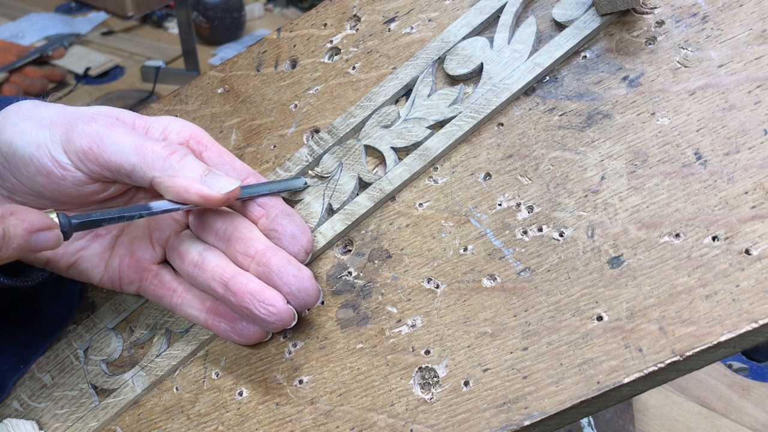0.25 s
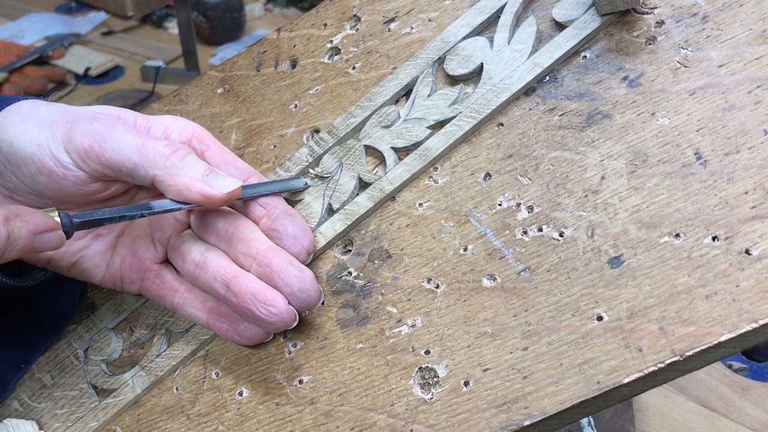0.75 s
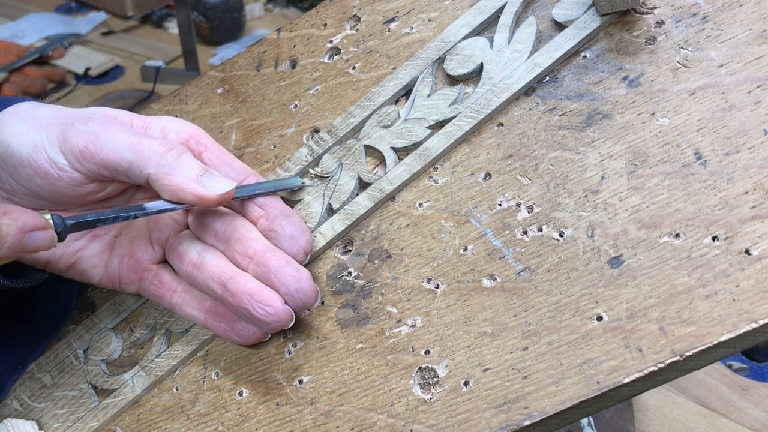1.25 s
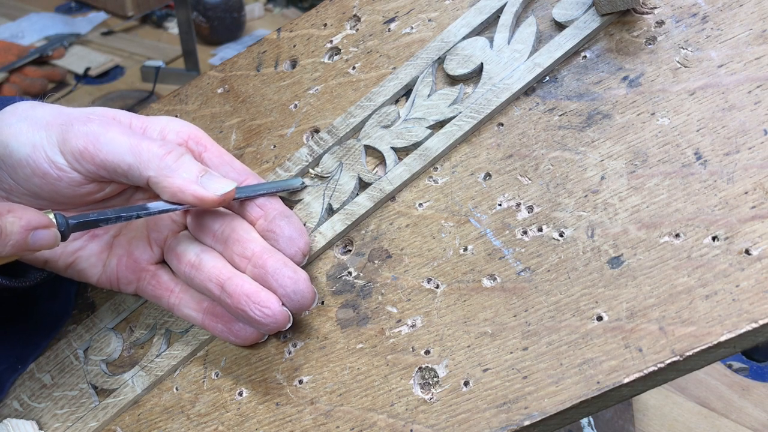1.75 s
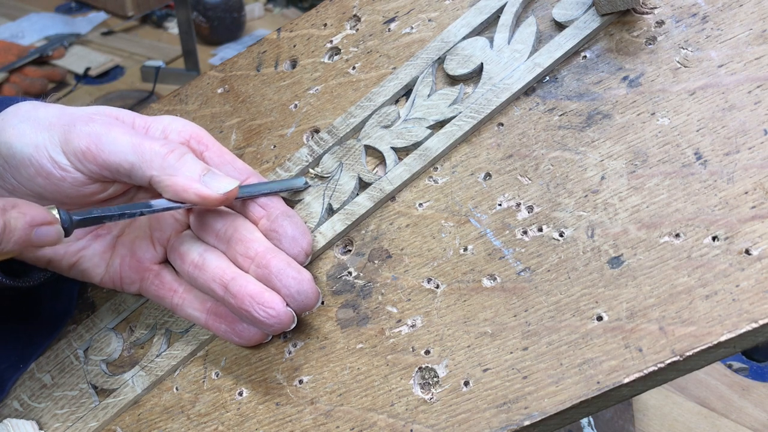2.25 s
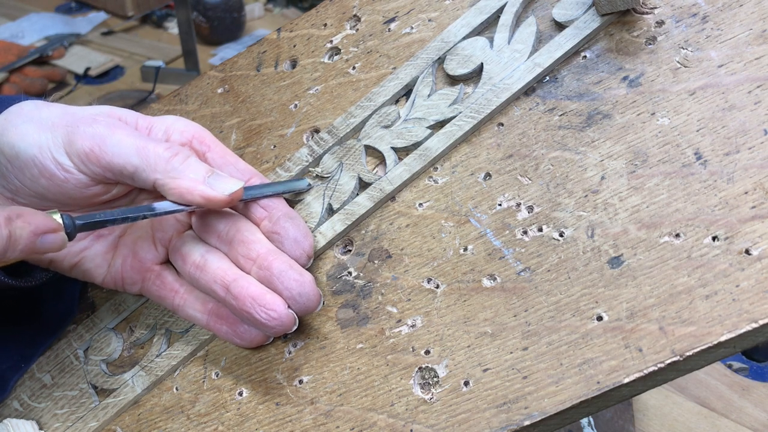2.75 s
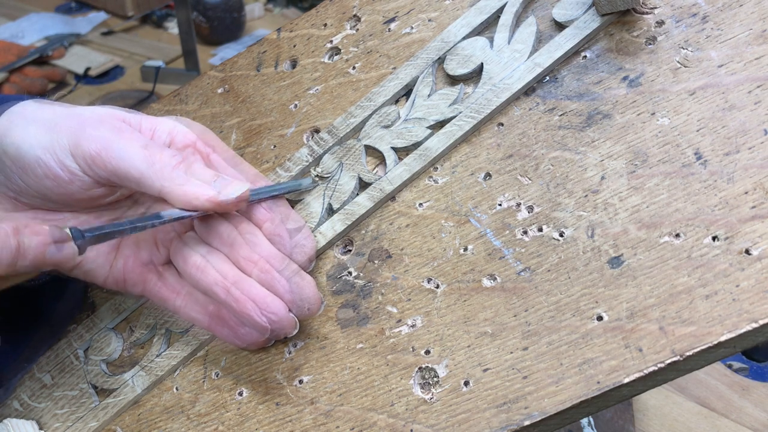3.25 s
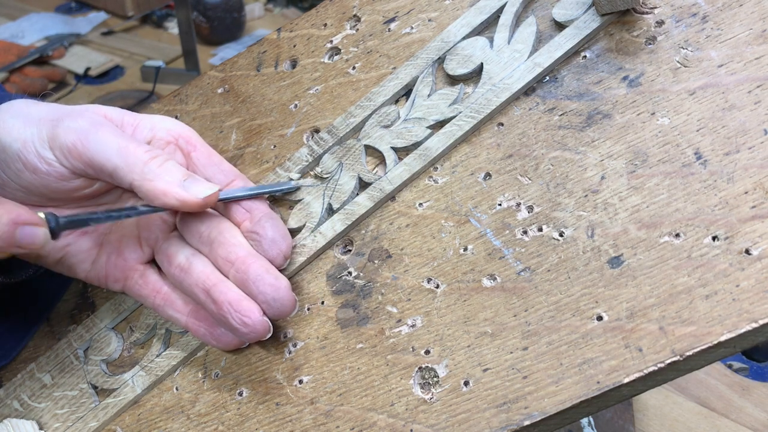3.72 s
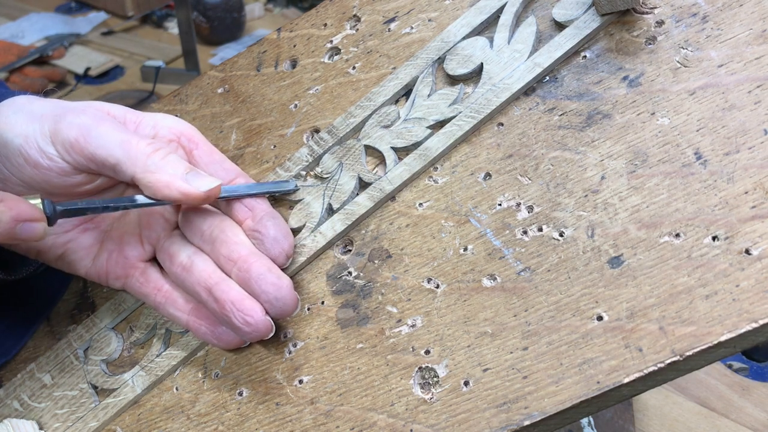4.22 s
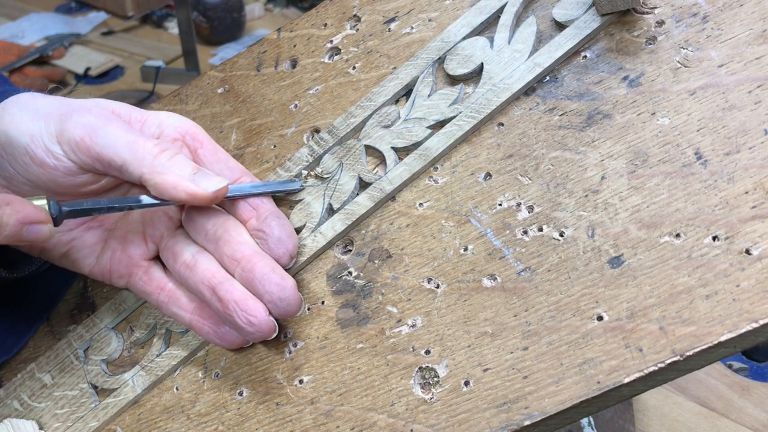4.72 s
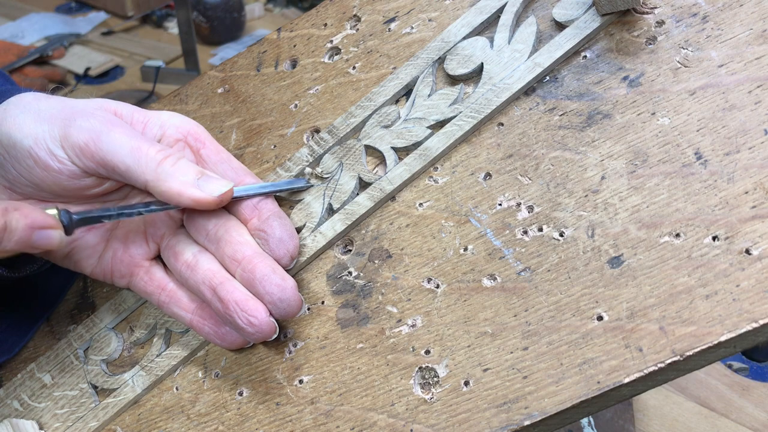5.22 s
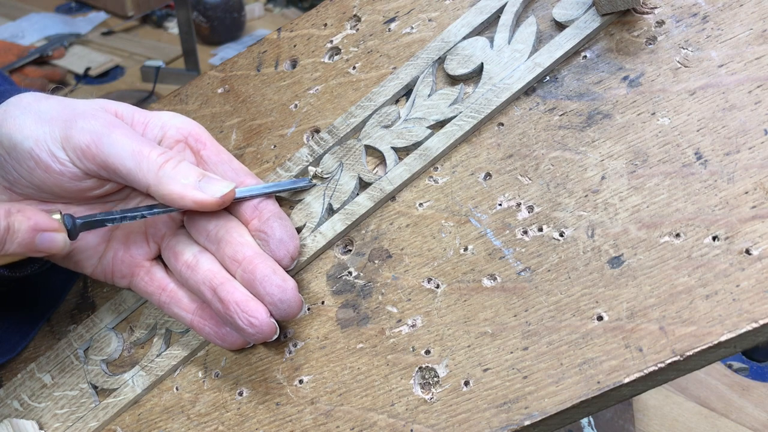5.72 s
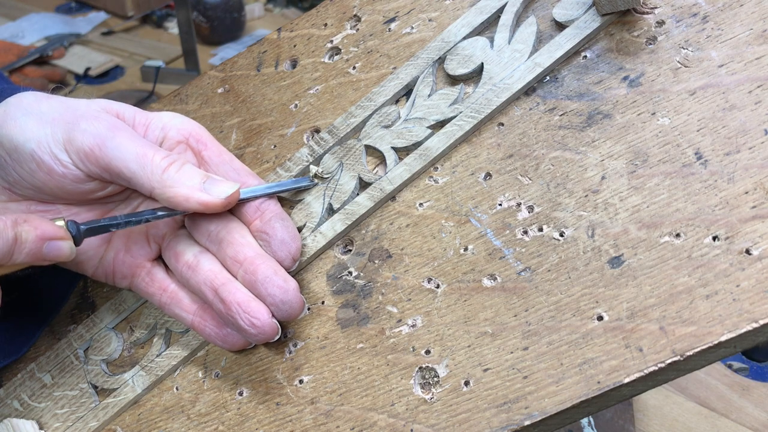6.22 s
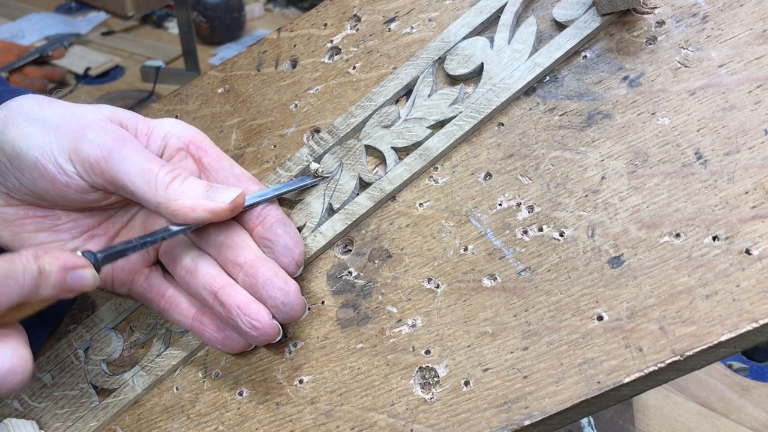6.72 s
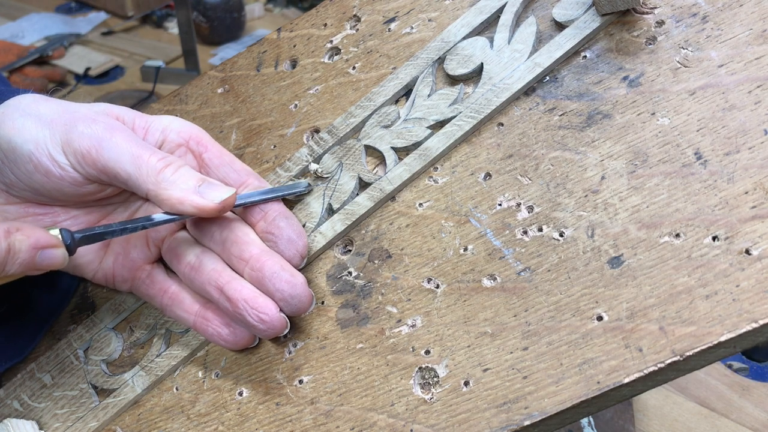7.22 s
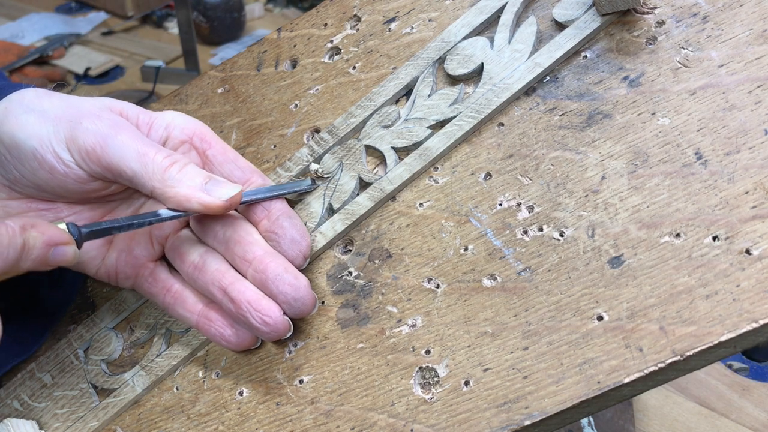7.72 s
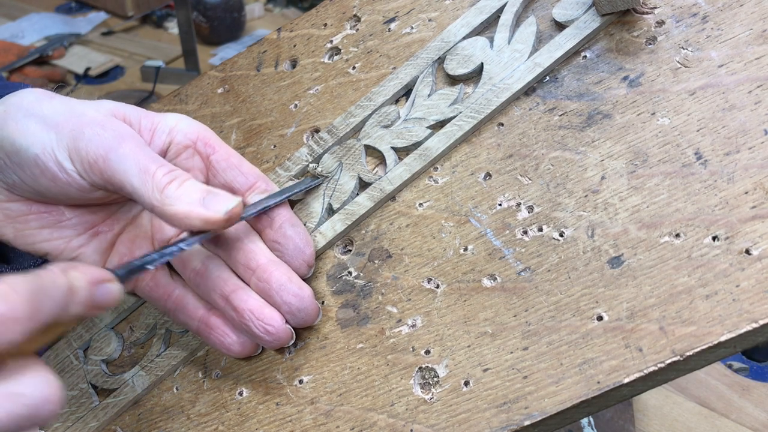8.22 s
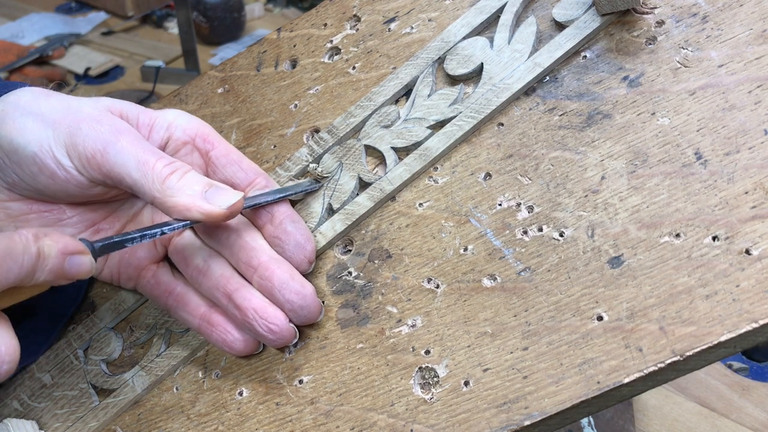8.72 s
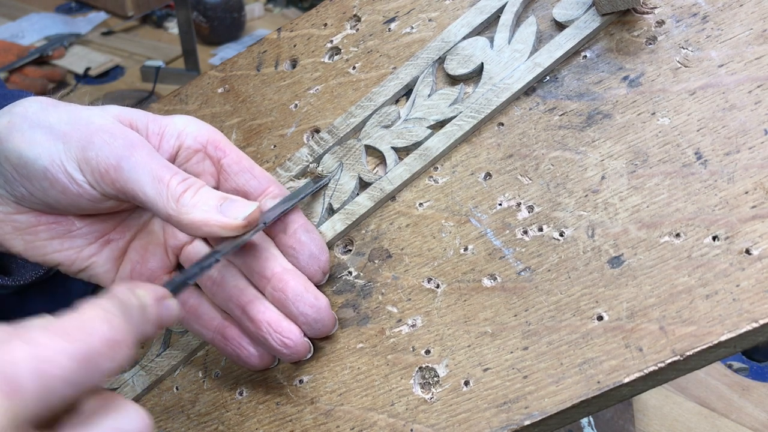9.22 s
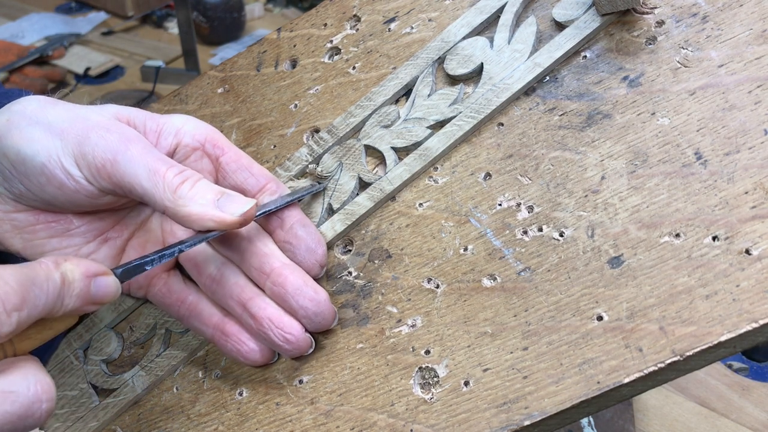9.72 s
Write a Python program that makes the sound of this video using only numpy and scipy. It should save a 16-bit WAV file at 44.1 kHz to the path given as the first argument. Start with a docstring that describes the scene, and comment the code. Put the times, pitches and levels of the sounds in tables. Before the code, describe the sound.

Close, dry scrapes come at irregular intervals as a small tool skims and bites into a thin strip of wood. After the first few strokes, crisp little cracks of breaking chips and soft, hollow thuds on the workbench join in. The cutting turns lighter near the end. A low, steady workshop rumble lies underneath, and a distant, even ticking appears in short runs.

```python
"""A short, woody scrape comes first: a small hand tool pares the sawn edges of a thin fretwork strip.
More uneven strokes follow. Tearing fibres make the strip ring, and the tool chatters when it bites deep.
Chips snap off, and the strip thuds on the workbench as the tool breaks through.
Behind it all the workshop rumbles softly, with a faint, regular ticking that comes and goes."""
import sys
import numpy as np
from scipy import signal
from scipy.fft import rfft, irfft
from scipy.io import wavfile
from scipy.ndimage import uniform_filter1d

SR = 44100
rng = np.random.default_rng(int(sys.argv[2]) if len(sys.argv) > 2 else 0)


def master(y):
    """Save y as 16-bit WAV."""
    cut = np.clip(np.atleast_2d(y).T, -1, 1)
    pcm = np.round(cut * 32767)  # scale
    wavfile.write(sys.argv[1], SR, pcm.astype(np.int16))


N = 438794
TIME = np.arange(N) / SR

# the tone of the room's rumble and hiss: f/Hz, relative level/dB
ROOM_SPECTRUM = [(15, -44), (25, -18), (64, -4), (145, -2.5), (309, -12), (344, -15), (416, -21),
                 (545, -23.5), (677, -24.5), (1260, -31), (2350, -32), (2990, -33.5), (6560, -35.5),
                 (14800, -43.5), (16000, -41)]
# runs of even ticking: first tick t/s, last tick t/s
TICK_RUNS = [(0.651, 2.108), (5.852, 6.935), (7.661, 8.386), (9.843, 9.843)]
# A mode is one note at which a thing rings. The next four tables: f/Hz, width/Hz, relative level/dB
TICK_RING_MODES = [(1776, 54, -3.5), (2010, 120, -11), (2370, 52, 3), (3960, 260, -16)]   # the tick
BENCH_MODES = [(48.5, 4.1, 3.5), (62, 14.3, 6), (102.6, 6.2, 4.5)]   # the bench top's deep thump
KNOCK_MODES = [(178, 24, -6), (242, 17, 0), (279, 22, -2.5)]   # the strip's hollow knock on the bench
CLACK_MODES = [(430, 45, -10), (555, 34, -4), (625, 45, -7), (738, 34, -0.5)]   # its harder clack
# the strip's own modes: f/Hz, width/Hz, level/dB when cut at the first spot, level/dB at the second
STRIP_MODES = [(237, 29, -1.5, 2.5), (279.4, 33, -15, -11), (554.2, 15, -3.5, -3.5), (622, 17, -13, -9),
               (732, 18.7, -9.5, -5), (1076, 14, -1, -7), (1141, 25, -4.5, -5.5), (1335, 21, -23, -26),
               (1482, 146, -11, -12.5), (1552, 26, -3.5, -6.5), (1705, 36, 0.5, -7), (1933, 94, -15.5, -8),
               (2230, 92, -9.5, -11.5), (2328, 90, -15.5, -12.5), (2562, 45, 3, -5.5),
               (2900, 87, -10, -11.5), (3020, 87, -27, -17), (3277, 88, -27, -12), (3484, 16, -5.5, -7.5),
               (3844, 123, -9.5, -10.5), (4524, 110, -14, -15), (4840, 140, -20.5, -19.5),
               (5410, 170, -17.5, -19), (5880, 55, -27, -18.5), (6370, 240, -24.5, -22.5),
               (7440, 1740, -29.5, -23.5), (9850, 1300, -35, -32), (12300, 3100, -36, -30),
               (14200, 683, -23, -40), (15000, 830, -38, -25)]
# the strip pressed onto the bench: t/s, relative level/dB, extra knock/dB, extra clack/dB
BENCH_HITS = [(2.442, -41, 15, 7), (2.879, -29.5, -1, -9), (2.932, -37.5, 13, -8), (3.332, -52, 18, -1),
              (3.361, -45, 18, -5), (3.572, -25, -5, -6), (4.032, -29, -14, -18), (4.399, -34.5, -8, -9),
              (4.841, -24.5, -11, -7), (4.869, -43, 12.5, -12), (5.259, -31.5, 4.5, 4),
              (5.279, -29, -5, -4), (5.639, -32, 0, -18), (6.108, -30.5, -19, -14), (6.211, -33, -6, -7),
              (6.258, -34.5, -8, -10), (6.487, -34.5, 5, -21), (6.526, -36, -8, -24), (6.588, -39, -2, -5),
              (7.769, -32, 4.5, -8), (7.849, -32, 3.5, -1.5), (7.901, -25, -6, -9), (7.953, -29, -6, -22),
              (8.968, -32.5, 5, -8)]
# chips snapping and the tool catching: t/s, level/dB, lows/dB, highs/dB, tilt/(dB per octave),
# trail of splinters/dB (lows, highs and trail are relative; tilt above zero is brighter)
CHIP_SNAPS = [(2.496, -37.5, -22, -7, 3, -15), (2.657, -48.5, -19, -18, -6, -17),
              (3.289, -44, -6, -12, -1, -10), (3.3718, -41, -13, -11, 4, -10),
              (3.5662, -38, -2, -11, -2, -15), (3.8332, -44, -15, -22, -5, -12),
              (4.8265, -29, 1.5, -17, 2, -5), (5.253, -30, 6.5, -10.5, 0, -15),
              (6.047, -37, -22, -17, -2, -22), (6.0681, -38, -21, -21, 1, -17),
              (6.0844, -40, -18, -22, -1, -15), (6.142, -46, -16, -0.5, 3, -5),
              (6.1587, -40, -8, -9, 1, -2), (6.2113, -36, 5, -16, -2.5, -9),
              (6.2722, -44.5, -20, -15, 1, -23), (6.3096, -43.5, -3, -13, 0, -17),
              (6.3402, -43.5, -14, -15, -4.5, 4), (6.4899, -34, -26, -12.5, -1, -13),
              (6.497, -36, -26, -21, 2, -20), (6.5943, -35.5, -18, -11, 1, -17),
              (6.8745, -47.5, -14, -10, 4, -11), (7.2577, -41.5, -8, -32, -11, -18),
              (7.7677, -34.5, -22, -12, -4, -12), (7.8516, -36, -12, -10.5, -1.5, 1),
              (7.891, -32.5, 0, -5.5, -2, -4), (7.9189, -30.5, -2, -8, -5, -12),
              (8.0604, -46, -17, 0, 8, -15), (9.2250, -35.5, -17, -2.5, 8.5, -22),
              (9.7979, -45, -3, -28, -12, -22)]
# tool strokes, a light skim and then a bite: full bite t/s, hold/s, bite level/dB, swell/s,
# skim before the bite/s, skim level/dB, relative lows/dB, tilt/(dB per octave)
TOOL_STROKES = [(0.004, 0.0072, -37.5, 0.06, 0, -62, 5, -1.5),
                (0.446, 0.015, -36.5, 0.092, .19, -60, 1.5, -1),
                (0.860, 0.067, -43.5, 0.13, .10, -64, -2, -.8),
                (1.953, 0.047, -40, 0.043, 0.072, -62, -2, 1.5),
                (2.438, 0.043, -41, 0.13, 0.13, -60, 0, -0.7),
                (2.735, 0.02, -53.5, 0.05, 0.015, -60, -9, -1),
                (2.868, 0.069, -42, .07, 0.077, -59, 1, 0.5), (3.195, 0.06, -51, .065, 0, -58, -3, -3),
                (3.330, 0.0072, -41, 0.051, 0.052, -54, 2.5, -0.5),
                (3.366, 0.013, -49, 0.025, 0.071, -66, 5.5, -1), (3.412, 0.021, -54, 0.03, 0, -60, -13, -1),
                (3.563, 0.011, -40, .11, .13, -58, 0, 4), (3.670, .012, -58, .04, 0, -60, -1.5, 1),
                (3.842, 0.012, -47.5, 0.019, 0.0062, -60, -10, -1.5),
                (3.985, .048, -44.5, 0.21, 0.067, -55.5, -2, 3),
                (4.378, 0.061, -46.5, 0.2, 0.11, -54.5, -2, 1.5),
                (4.678, 0.011, -50, 0.035, 0, -58, -13, -2), (4.797, 0.042, -43.5, 0.15, .10, -59, -2, 1),
                (5.200, .052, -45, 0.19, 0.11, -52, -2, 1),
                (5.615, 0.051, -44, 0.083, 0.14, -54, -2.5, -0.5),
                (6.050, 0.037, -45.5, 0.13, 0.08, -53, -2, 0),
                (6.500, 0.043, -54.5, 0.018, 0.062, -65, 1.5, -3), (6.585, .016, -52, 0.021, 0, -60, 3, -3),
                (7.260, .035, -64, .02, 0, -58, -6, -6), (7.775, 0.035, -50.5, .012, 0.23, -59, 2, -3),
                (7.880, 0.051, -45.5, 0.062, 0, -60, 4.5, -2.5),
                (8.045, .02, -55, .07, 0.055, -59.5, 1.5, -2), (8.150, .11, -67, .05, 0.0087, -63, 0, -3),
                (8.760, 0.016, -60, .03, 0, -62, -8, -7), (8.930, 0.052, -48.5, .15, 0.1, -53, 1.5, -2.5),
                (9.020, 0.13, -55.5, 0.094, 0, -60, 1.5, -0.5),
                (9.214, 0.021, -51.5, 0.065, 0.013, -53, -2.5, 2)]


def from_db(db):
    """Turn decibels into a gain to multiply by."""
    return 10 ** (np.asarray(db) / 20)


def rms_one(x):
    """Scale a sound so that its average strength (rms) is 1."""
    return x / np.sqrt(np.mean(x ** 2) + 1e-20)


def peak_one(x):
    """Scale a sound so that its loudest millisecond swings to about 1."""
    return x / np.sqrt(2 * uniform_filter1d(x ** 2, size=44).max() + 1e-20)


def add(out, start_s, sound):
    """Mix a sound in at the given time."""
    i = int(np.clip(start_s * SR, 0, N - 1))
    out[i:i + len(sound)] += sound[:N - i]


def keep_band(x, hz, side, order=3):
    """Keep the "low" or the "high" side of a frequency."""
    return signal.sosfilt(signal.butter(order, hz, side, fs=SR, output="sos"), x + 1e-18)


def three_bands(x, low_hz=930, high_hz=6600):
    """Split a sound into woody lows, a rasping middle and crisp highs."""
    above_lows = keep_band(x, low_hz, "high", 5)
    middle = keep_band(above_lows, high_hz, "low", 5)
    return keep_band(x, low_hz, "low", 5), middle, keep_band(x, high_hz, "high", 5)


def drift(rate_hz):
    """A smooth random wobble of size 1 that changes about rate_hz times a second."""
    smoothing = 1 + (np.fft.rfftfreq(N, 1 / SR) / rate_hz) ** 2
    return rms_one(irfft(rfft(rng.standard_normal(N)) / smoothing, N))


def resonate(force, modes):
    """Let a force ring each mode, and add them up with alternating signs."""
    out = 0
    for k, (hz, width_hz, db) in enumerate(modes):
        decay = np.exp(-np.pi * width_hz / SR)   # wider modes die sooner
        poles = [1, -2 * decay * np.cos(2 * np.pi * hz / SR), decay ** 2]
        ring = signal.lfilter([1, 0, -1], poles, force + 1e-18)
        out = out + (-1) ** k * from_db(db) * (1 - decay ** 2) / 2 * ring
    return out


def room_rumble(level_db=-48.3):
    """The room's steady low rumble under an even hiss."""
    hz, db = np.transpose(ROOM_SPECTRUM)
    colour = from_db(np.interp(np.log(np.fft.rfftfreq(N, 1 / SR) + 1), np.log(hz), db))
    return from_db(level_db) * rms_one(irfft(rfft(rng.standard_normal(N)) * colour, N))


def ticking(every_s=0.364, rise_s=0.0031, fall_s=0.021, level_db=-48.5):
    """Each distant tick arrives smeared into a short ringing puff."""
    out, t = np.zeros(N), TIME[:SR // 5]
    for first, last in TICK_RUNS:
        for start_s in np.linspace(first, last, round((last - first) / every_s) + 1):
            puff = (1 - np.exp(-t / rise_s)) * np.exp(-t / fall_s) * rng.standard_normal(len(t))
            add(out, start_s, from_db(level_db) * peak_one(resonate(puff, TICK_RING_MODES)))
    return out


def with_wall_echo(x, fade_s=0.17, dull_hz=5000, echo_db=-19):
    """The walls add a short, dull tail to a sound."""
    t = TIME[:SR // 2]
    echoes = rng.standard_normal(len(t)) * from_db(-60 * t / fade_s) * (t > .004)
    tail = keep_band(echoes, dull_hz, "low", order=1)
    return x + from_db(echo_db) * signal.fftconvolve(x, tail / np.linalg.norm(tail))[:N]


def bench_thuds(push_s=0.00098, thump_db=-4, knock_db=-2, clack_db=-3):
    """A soft push sets the bench top swinging, and the strip knocks on it."""
    out, t = np.zeros(N), TIME[:SR // 2]
    push = t * np.exp(-t / push_s)
    thump, knock, clack = (peak_one(resonate(push, m)) for m in (BENCH_MODES, KNOCK_MODES, CLACK_MODES))
    for start_s, db, extra_knock, extra_clack in BENCH_HITS:
        contact = from_db(knock_db + extra_knock) * knock + from_db(clack_db + extra_clack) * clack
        add(out, start_s, from_db(db) * (from_db(thump_db) * thump + contact))
    return out


def strip_ring(force, at_second_spot, tilt_db, scatter_db=1.0, width_scale=0.95, detune=0.0027):
    """The hand-held strip rings; each touch shifts the level and pitch of its modes a little."""
    hz, width_hz, first_db, second_db = np.transpose(STRIP_MODES)
    db = (second_db if at_second_spot else first_db) + tilt_db * np.log2(np.maximum(hz, 500) / 2000)
    db = db + scatter_db * rng.standard_normal(len(hz))
    hz = hz * (1 + detune * rng.standard_normal(len(hz)))
    modes = zip(hz, width_scale * width_hz, db)
    # each fibre sits somewhere else on the strip, so it pushes a mode one way or the other
    return sum(resonate(force * rng.choice([-1, 1], len(force)), [mode]) for mode in modes)


def snapping_chips(crack_s=0.0014, splinter_s=0.0089, low_db=-4):
    """A chip breaks with one crack and a short trail of splintering fibres."""
    out, t = np.zeros(N), TIME[:SR // 10]
    for start_s, db, weight_db, crisp_db, tilt_db, trail_db in CHIP_SNAPS:
        fade = np.exp(-t / crack_s) + from_db(trail_db) * np.exp(-t / splinter_s)
        burst = fade * rng.standard_normal(len(t))
        low, mid, high = three_bands(strip_ring(burst, at_second_spot=True, tilt_db=tilt_db))
        body = from_db(weight_db + low_db) * rms_one(low)
        snap = body + rms_one(mid) + from_db(crisp_db) * rms_one(high)
        add(out, start_s, from_db(db) * snap * np.std(peak_one(mid)))   # db sets the middle band's peak
    return out


def tearing_fibres(fibres_per_s=5000, size_db=3, rub=0.31, grain_db=1, catches_per_s=22, catch_s=0.0016):
    """Fibres tear one by one over a smooth rub; the grain varies, and a tough fibre sometimes catches."""
    sizes = from_db(size_db * np.minimum(rng.exponential(1, N), 4)) * rng.choice([-1, 1], N)
    tears = rms_one(sizes * (rng.random(N) < fibres_per_s / SR))
    rubbing = rub * rng.standard_normal(N)
    catches = (rng.random(N) < catches_per_s / SR) * rng.random(N)
    strain = 2 * signal.lfilter([1], [1, -np.exp(-1 / (catch_s * SR))], catches + 1e-18)
    return (tears + rubbing) * (1 + strain) * from_db(grain_db * drift(42))


def paring_strokes(chatter_hz=205, chatter=0.17, deep_bite_db=-43, second_spot_from_s=3.1):
    """The tool skims, bites and lets go; in a deep bite it sticks and slips, tearing fibres in bunches."""
    skim_rise_s, swell_db = 0.011, 24
    rasp_fade_db_per_s, body_fade_db_per_s = 553, 366   # the woody lows fade last
    firm_db, high_db, low_db = -40, -14, -1   # a firm bite, and its highs and lows against the middle
    out, tears = np.zeros(N), tearing_fibres()
    slip = np.cos(2 * np.pi * np.cumsum(chatter_hz * (1 + 0.2088 * drift(41.1))) / SR)
    for bite_s, hold_s, bite_db, swell_s, skim_s, skim_db, weight_db, tilt_db in TOOL_STROKES:
        span = (TIME > bite_s - .26) & (TIME < bite_s + hold_s + .12)
        t = TIME[span] - bite_s
        skim = from_db(skim_db) * np.clip(1 + (t + skim_s) / skim_rise_s, 0, 1)
        bite = from_db(bite_db + swell_db * np.minimum(t, 0) / swell_s)
        pressure = np.maximum(skim, bite)
        pressure_db = 20 * np.log10(pressure + 1e-9)
        chatter_depth = chatter / (1 + from_db(deep_bite_db - pressure_db))
        force = tears[span] * np.exp(2 * chatter_depth * slip[span] - 2 * chatter_depth ** 2)
        ring = strip_ring(force, bite_s >= second_spot_from_s, tilt_db)
        low, mid, high = map(rms_one, three_bands(ring))
        lightness_db = firm_db - pressure_db   # a light touch favours the highs, and the lows a little
        rasp = mid + from_db(high_db + 0.1663 * lightness_db) * high
        body = from_db(weight_db + low_db + 0.05 * lightness_db) * low
        since_release_s = np.maximum(t - hold_s, 0)
        rasp *= from_db(-rasp_fade_db_per_s * since_release_s)
        body *= from_db(-body_fade_db_per_s * since_release_s)
        out[span] += pressure * (rasp + body)
    return out


def scene():
    """Tool, strip and bench close by, the room behind, in one channel."""
    woodwork = paring_strokes() + snapping_chips() + bench_thuds()
    return (with_wall_echo(woodwork) + ticking() + room_rumble())[None]


def record(dry, bass_hz=41, top_hz=15900):
    """The microphone drops the deepest bass; the highest treble is cut steeply."""
    treble_cut = signal.ellip(12, .1, 80, top_hz, fs=SR, output="sos")
    return signal.sosfilt(treble_cut, keep_band(dry, bass_hz, "high", order=6))


dry = scene()
out = record(dry)
master(out)
```